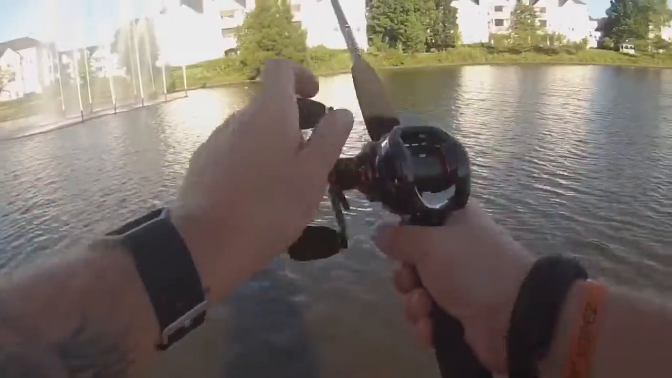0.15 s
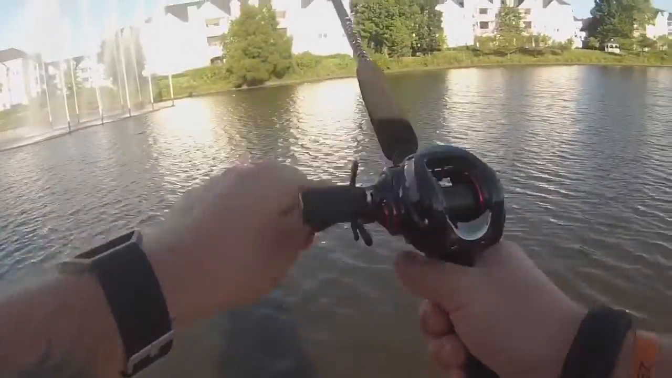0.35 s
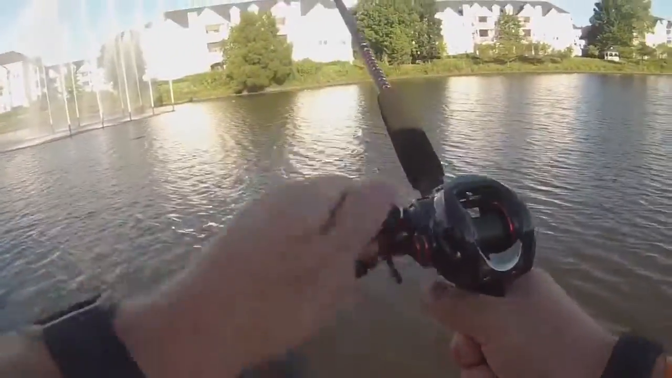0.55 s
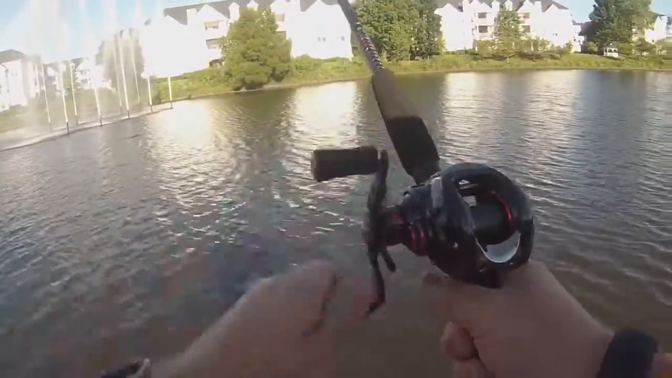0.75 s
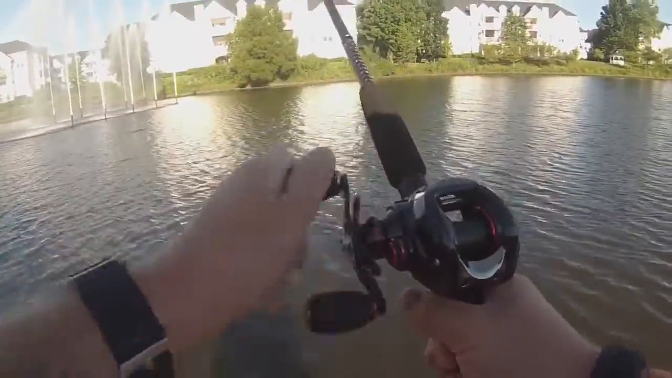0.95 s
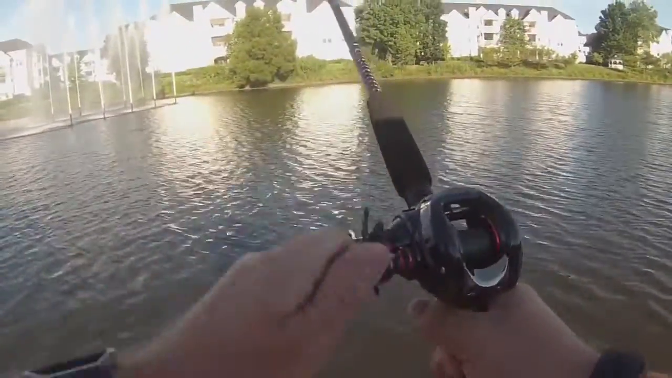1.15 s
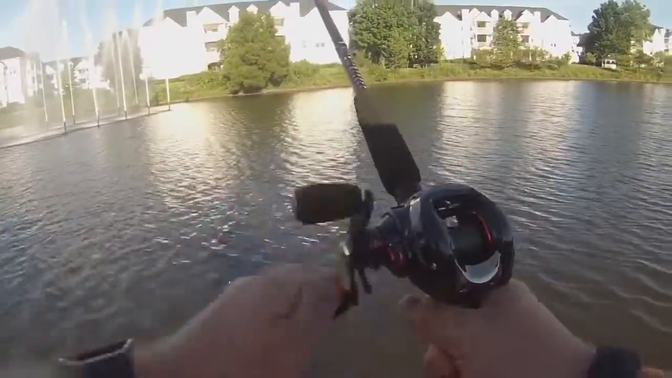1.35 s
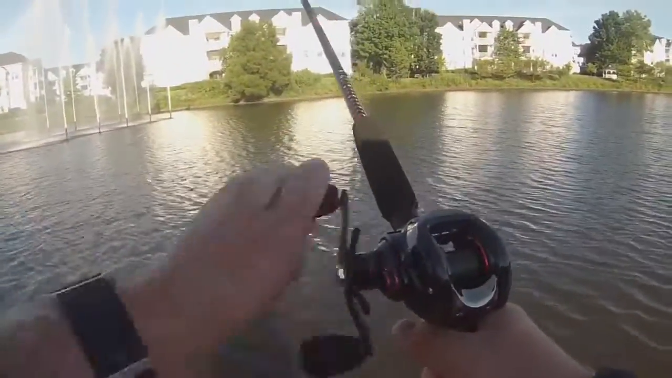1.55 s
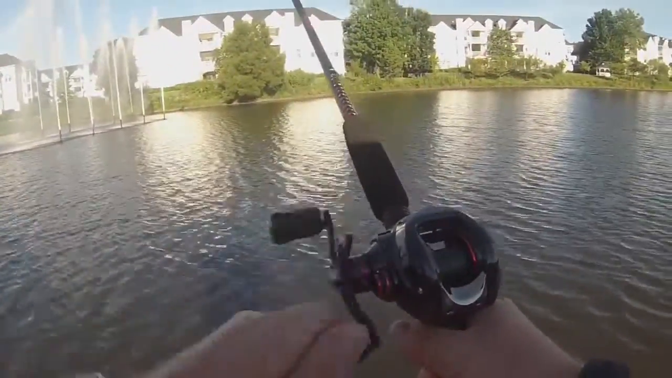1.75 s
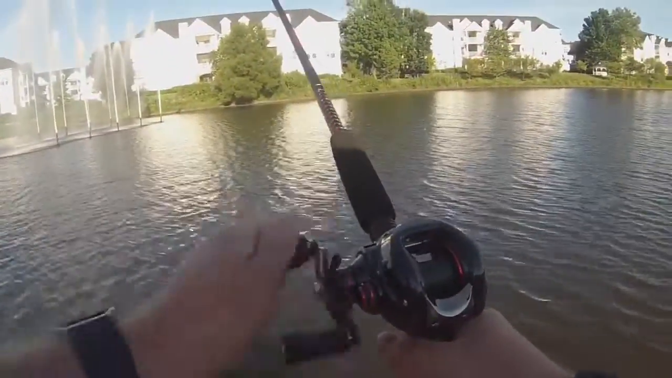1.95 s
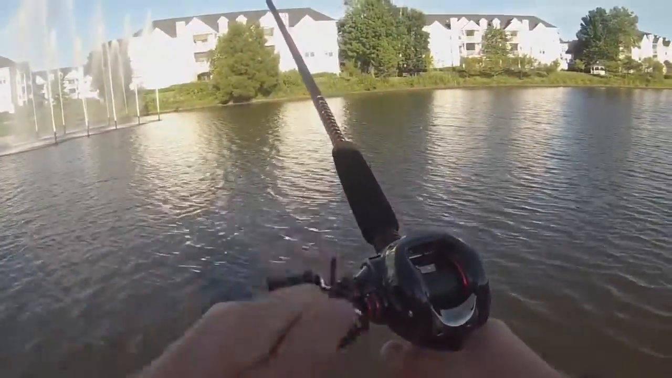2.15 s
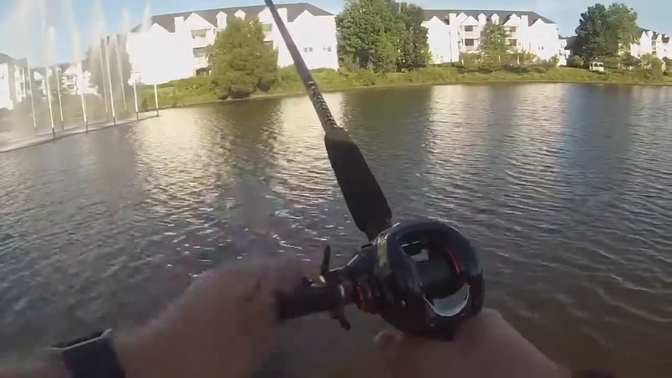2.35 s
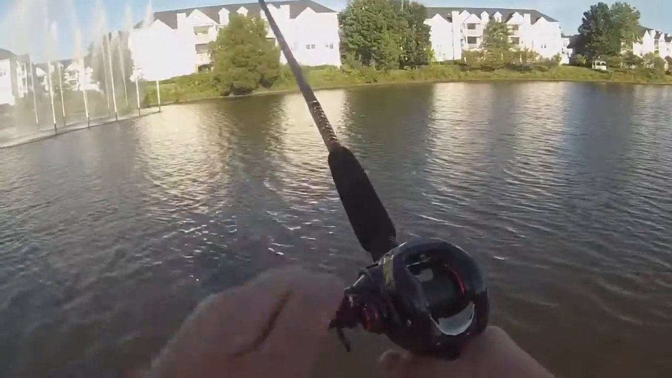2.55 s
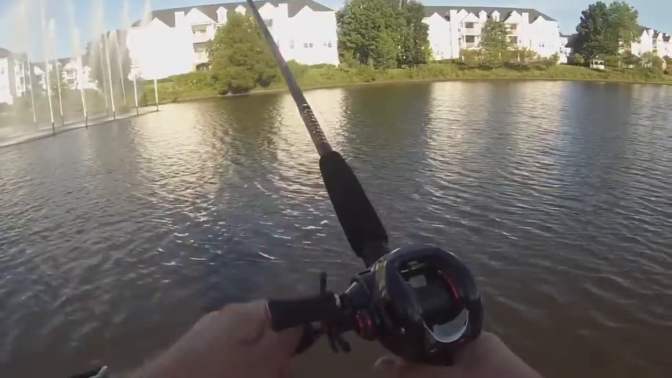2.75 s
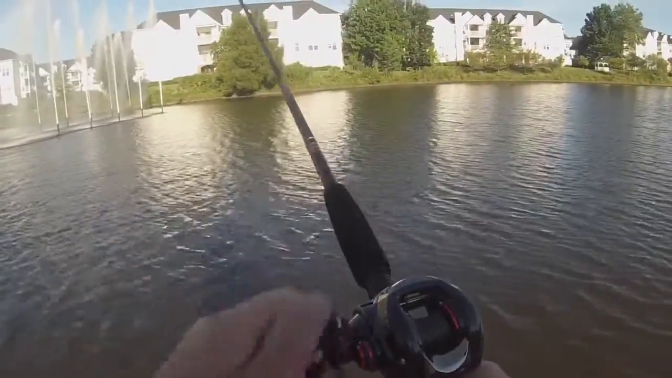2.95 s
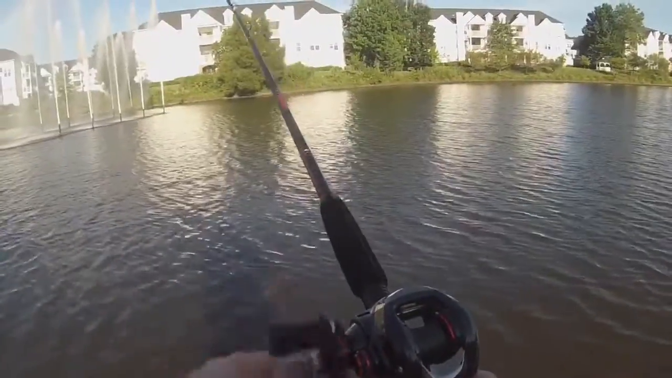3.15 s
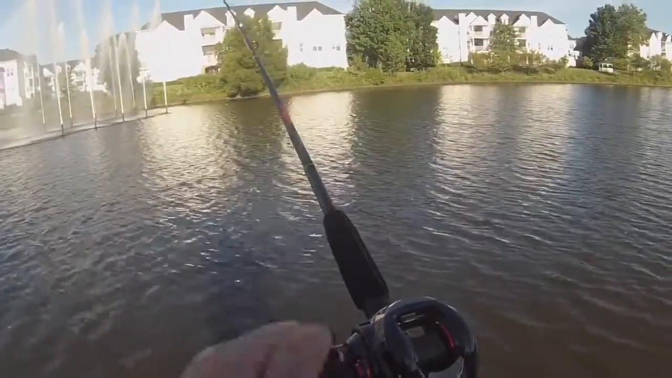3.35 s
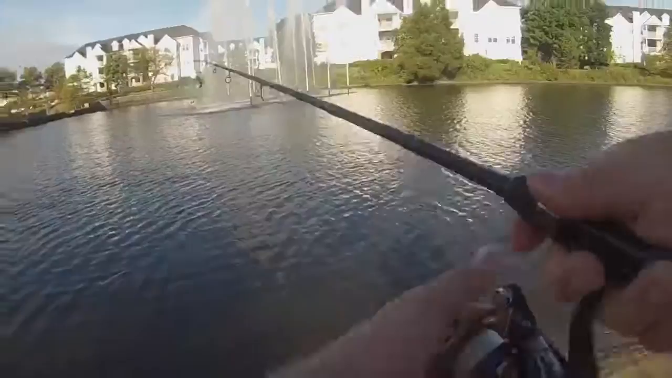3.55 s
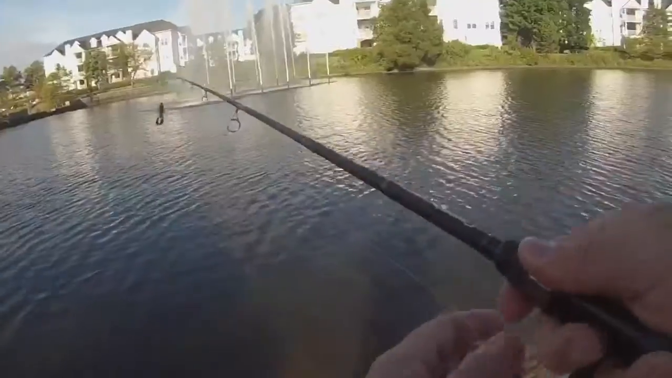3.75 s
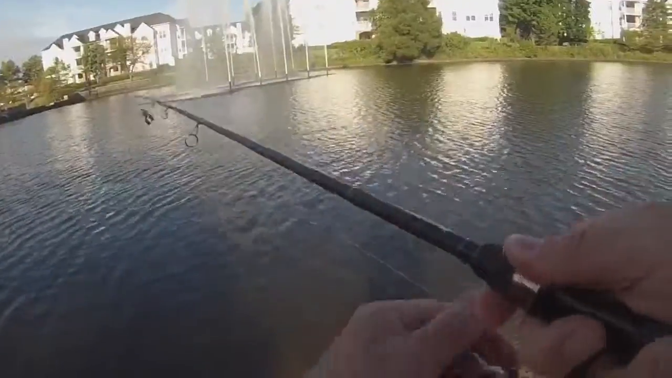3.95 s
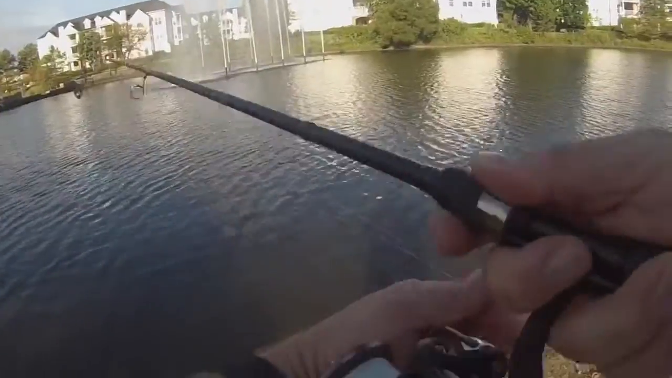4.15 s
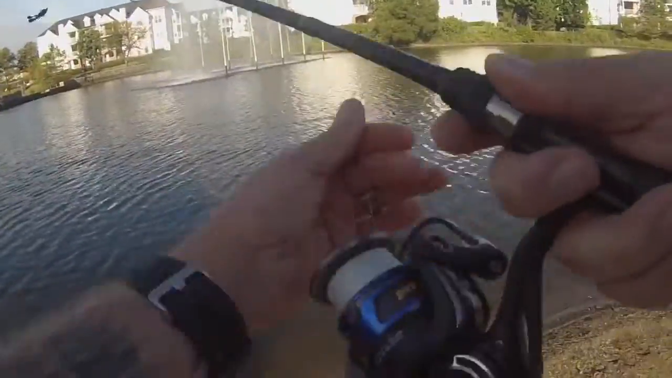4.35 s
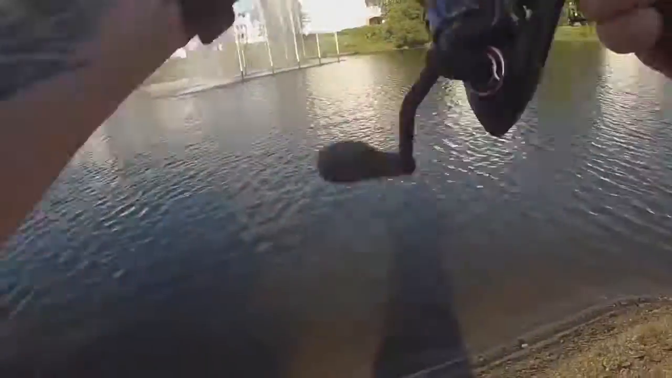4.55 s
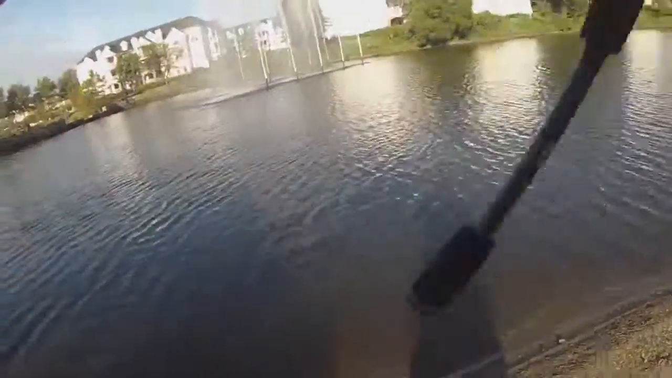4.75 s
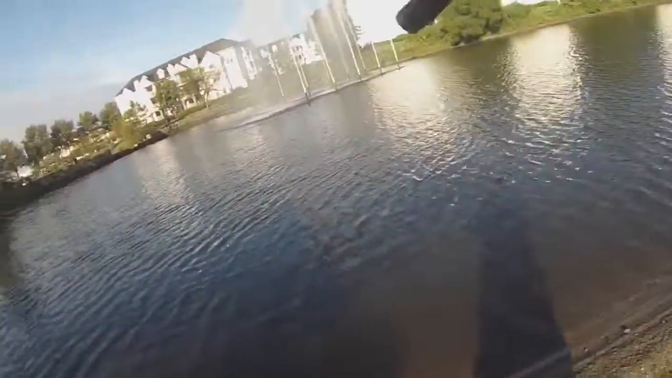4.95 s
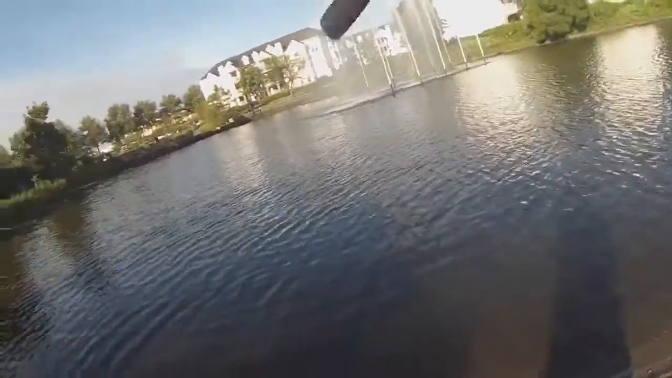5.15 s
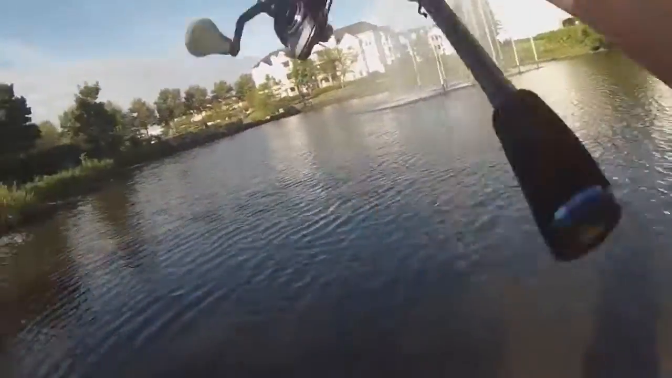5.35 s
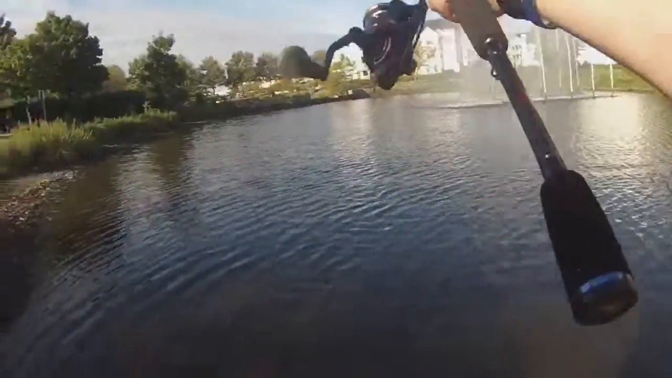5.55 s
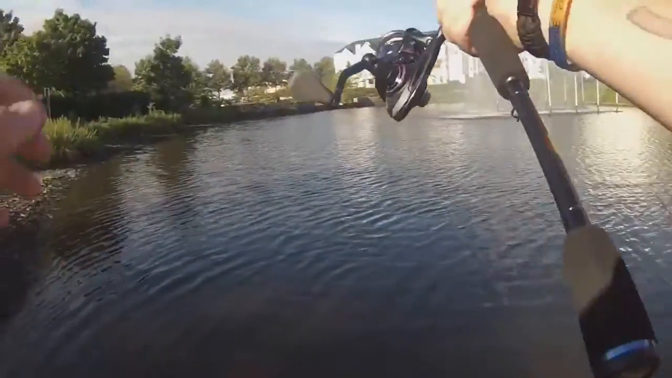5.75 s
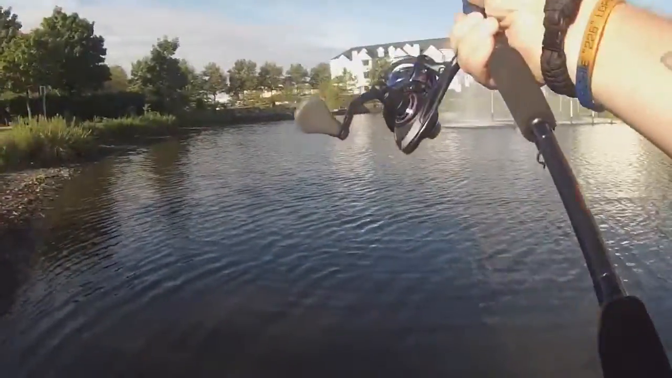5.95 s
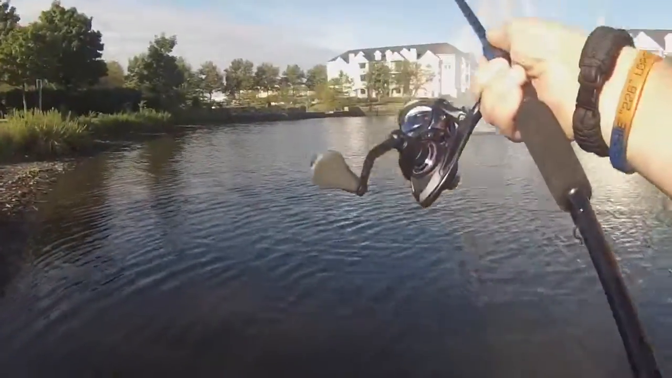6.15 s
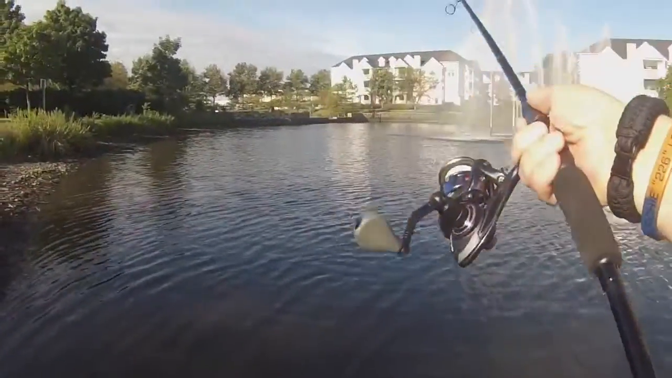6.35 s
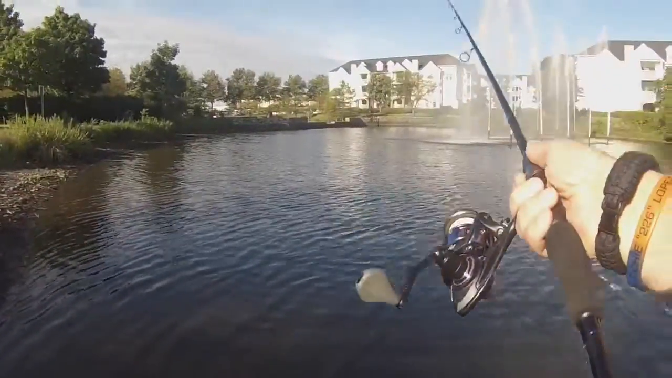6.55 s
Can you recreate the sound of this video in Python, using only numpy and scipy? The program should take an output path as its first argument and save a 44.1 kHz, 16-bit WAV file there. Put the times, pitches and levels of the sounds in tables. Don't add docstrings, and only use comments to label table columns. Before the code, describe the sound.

Outdoors by a pond, a faint continuous wash of far falling water, coloured hollow and plasticky by the microphone's sealed housing. First comes a crisp metallic reel clack and a few dull pops, then mostly hiss and low wind. After a momentary fade, a soft motor hum lies beneath; light clicks lead to one strong woody knock on the housing, then crackly strap tugs, a ringing tick and weak rattles.

```python
import sys
import numpy as np
from scipy import signal
from scipy.fft import rfft, irfft
from scipy.io import wavfile
from scipy.ndimage import uniform_filter1d

SR = 44100
rng = np.random.default_rng(int(sys.argv[2]) if len(sys.argv) > 2 else 0)


def to_linear_factor(level_db):
    exponent = np.asarray(level_db, float) / 20
    return 10 ** exponent


def dump(signal):
    limited = np.clip(np.atleast_2d(signal).T, -1, 1)
    pcm = np.round(limited * 32767).astype(np.int16)
    wavfile.write(sys.argv[1], SR, pcm)


N = 291501
EDIT_S = 3.613


def evened(x):
    return x / np.sqrt(np.mean(x ** 2) + 1e-20)


def read_spectrum(points, hz):
    point_hz, value = np.transpose(points)
    return np.interp(np.log(hz + 1), np.log(point_hz + 1), value)


def add(mix, start_s, sound):
    part = mix[round(start_s * SR):][:len(sound)]
    part += sound[:len(part)]


def drift(t, lo_hz, hi_hz):
    hz = np.geomspace(lo_hz, hi_hz, num=30)[:, None]
    sines = np.sin(2 * np.pi * (hz * t + rng.random(hz.shape)))
    return evened((sines / np.sqrt(hz)).sum(0))


def coloured_noise(level_db, size=1024):
    frames = 4 * N // size + 5
    hz = np.fft.rfftfreq(size, 1 / SR)[:, None]
    t = np.arange(frames) * size / 4 / SR
    real, imag = rng.standard_normal((frames, len(hz), 2)).T
    spectra = (real + 1j * imag) * to_linear_factor(level_db(hz, t))
    return evened(signal.istft(spectra, nperseg=size, noverlap=3 * size // 4)[1][:N])


# pitch_hz, width_hz, side_on_gain_db, facing_water_gain_db
CASE_MODES = [(1174, 350, 4.5, 5.5), (1401, 250, 10, 11.5), (1660, 234, 10, 13), (1904, 98, -4.5, 10),
              (2180, 105, -3.5, -6), (2338, 146, 5.5, 5.5), (2588, 97, 4.5, 6.5), (2800, 240, 0, 2),
              (3225, 300, 8, 8.5), (3527, 236, 9.5, 12.5), (3846, 335, 11, 4), (4290, 250, 4.5, -7.5),
              (4870, 460, 8.5, -4.5), (5660, 330, 5.5, 1), (6500, 570, -0.5, -0.5), (7100, 130, -7, 4),
              (7200, 300, 5, -8), (7800, 240, 2, -9), (8150, 200, 0.5, 2), (10400, 490, 1, -2.5)]


def case_db(hz, turn):
    total = 0
    for mode_hz, width_hz, side_db, facing_db in CASE_MODES:
        bump = np.exp(-np.log(16) * ((hz - mode_hz) / width_hz) ** 2)
        total = total + (side_db + (facing_db - side_db) * turn) * bump
    return total


# pitch_hz, density_db (per Hz)
SPRAY_FIRST = [(150, 2.5), (350, 0), (700, -1), (2000, 0), (3000, -8.5), (4100, -12.5), (5400, -14.5),
               (7000, -13), (8500, -20.5), (11000, -20.5), (13000, -25.5), (15000, -29.5)]
# pitch_hz, density_db (per Hz)
SPRAY_SECOND = [(150, -9), (350, 1.5), (700, -0.5), (2000, 1), (3000, -6.5), (4100, -9), (5400, -15),
                (7000, -12), (8500, -20.5), (11000, -21.5), (12500, -29), (13800, -20.5), (15000, -28)]
# time_s, level_db, turn_to_water (0-1)
FOUNTAIN_MOVES = [(0, -51, 0.04), (.9, -50.5, 0.03), (1.2, -51, 0), (2, -50, 0.06), (3, -52.5, 0),
                  (3.6, -52, 0), (3.63, -52.5, 0.32), (4.2, -52, .3), (4.8, -52, 0.38), (5, -50, 0.57),
                  (5.5, -50.5, 0.76), (6, -50.5, 0.9), (6.62, -50.5, 0.93)]


def fountains(patchy_db=0.68, flicker_db=0.39):
    time_s, level_db, turn = np.transpose(FOUNTAIN_MOVES)

    def field(hz, t):
        patches = rng.standard_normal((len(t), len(hz))).T
        patches = uniform_filter1d(patches, size=16, axis=0)
        patches = evened(uniform_filter1d(patches, size=10, axis=1))
        spray = np.where(t < EDIT_S, read_spectrum(SPRAY_FIRST, hz), read_spectrum(SPRAY_SECOND, hz))
        db = spray + case_db(hz, np.interp(t, time_s, turn))
        db = db - 10 * np.log10((to_linear_factor(db) ** 2).sum(0))
        return db + patchy_db * patches + flicker_db * drift(t, 8, 60)

    return coloured_noise(field) * to_linear_factor(np.interp(np.arange(N) / SR, time_s, level_db))


KNOCK_S, KNOCK_DB = 5.0546, -15
# pitch_hz, level_db, t60_s, direction (signed)
KNOCK_MODES = [(137, -5, 0.058, -0.79), (454, -1.5, 0.023, 1), (544, -2.5, .018, 0.94),
               (772, -8, 0.035, -1.04), (980, -8, 0.016, -1.16), (1430, -20, 0.028, 1),
               (1830, -17.5, 0.026, -1.2), (2450, -16, 0.029, 0.86), (2690, -19.5, 0.027, -1.3),
               (3050, -18, 0.017, 1), (3420, -24, 0.017, -1.1), (3800, -35, .012, 1)]


def knock(slowness=0.0353, fastest_hz=900):
    out = 0
    for hz, db, t60_s, direction in KNOCK_MODES:
        delay_s = slowness / np.sqrt(min(hz, fastest_hz))
        t = np.maximum(np.arange(SR // 5) / SR - delay_s, 0)
        out = out + direction * to_linear_factor(db - 60 * t / t60_s) * np.sin(2 * np.pi * hz * t)
    return to_linear_factor(KNOCK_DB) * uniform_filter1d(out, size=7)


def tick(noise, level_db, rise_s, t60_s, pitch_hz, spread_oct):
    t = np.arange(len(noise)) / SR
    hz = np.fft.rfftfreq(len(noise), 1 / SR) + 1
    band = np.exp(-.5 * (np.log2(hz / pitch_hz) / spread_oct) ** 2)
    colour = to_linear_factor(0.66 * case_db(hz, 0.41)) * band
    ring = signal.hilbert(irfft(rfft(noise) * colour))
    ring = (ring / (abs(ring) + 1e-9) ** .6).real
    shape = np.minimum(t / rise_s, 1) * to_linear_factor(-60 * np.maximum(t - rise_s, 0) / t60_s)
    return to_linear_factor(level_db) * evened(ring) * shape


# start_s, level_db, rise_s, t60_s, pitch_hz, spread_oct
TICKS = [(0.169, -46, 0.0008, 0.022, 2360, .3), (.2174, -30, 0.0017, 0.048, 2410, 0.067),
         (.2190, -27, .002, 0.017, 3500, 0.11), (0.2175, -38.5, 0.0033, 0.017, 1600, .25),
         (0.2185, -36, 0.0026, 0.018, 6400, .08), (.2180, -42, 0.0034, 0.013, 5400, .08),
         (.2185, -38, .002, .015, 2880, .04), (.2190, -38.5, 0.0022, .012, 8150, 0.052),
         (.2170, -45, 0.0037, .012, 10300, 0.32), (0.2297, -42, 0.0027, 0.026, 2530, 0.38),
         (.329, -59, .001, .01, 4500, 0.45), (3.689, -41.5, 0.00086, 0.0098, 1580, .12),
         (3.689, -43, .001, 0.011, 3350, .12), (3.688, -50, .001, 0.0089, 4400, .06),
         (3.688, -48.5, .001, .01, 5900, .12), (3.688, -57, .001, .008, 8200, .15),
         (4.1455, -47.5, .002, .03, 1910, .12), (4.146, -47, .002, .04, 3480, .12),
         (4.1448, -51.5, 0.0024, 0.025, 7300, .5), (4.147, -54, .002, .03, 4430, .05),
         (4.147, -53, .002, .03, 5500, .05), (5.198, -50, .006, .06, 480, .08),
         (4.158, -58, .002, .02, 6500, .4), (4.587, -63, .001, .01, 7200, .2),
         (4.6114, -51, 0.0012, 0.02, 3600, .2), (4.6114, -57, 0.00082, 0.013, 6950, .25),
         (4.779, -61, .001, .015, 5000, .7), (5.262, -46, .003, 0.036, 3350, .12),
         (5.277, -31, 0.0018, 0.038, 3320, 0.053), (5.277, -45.5, 0.0017, 0.029, 4800, .5),
         (5.2765, -41, 0.0016, 0.023, 2800, .15), (5.278, -39.5, .003, 0.081, 1694, .05),
         (5.96, -57, 0.0084, .08, 2600, 0.091), (5.991, -57, .004, .06, 2630, .1),
         (6.035, -47, .002, .03, 2530, .15), (6.234, -52, .004, 0.1, 2600, 0.2),
         (6.265, -51, .004, .06, 2600, .15), (6.29, -53, 0.0037, .06, 2650, .1),
         (6.346, -57, .003, .04, 2700, .08)]


def reel_ticks():
    out = np.zeros(N)
    for (start_s, *part), noise in zip(TICKS, rng.standard_normal((len(TICKS), 4096))):
        add(out, start_s, tick(noise, *part))
    return out


def tug(peak_db, snap_s, direction, build_s, rebound_s):
    t = np.arange(SR // 5) / SR - 1 / 10
    swell = np.exp(-abs(t) / np.where(t < 0, build_s, rebound_s))
    return direction * to_linear_factor(peak_db) * np.tanh(t / snap_s) * swell


# snap_at_s, peak_db, snap_s, direction (signed), build_s, rebound_s
TUGS = [(0.171, -44, 0.0022, -1, 0.0044, .01), (0.354, -38.5, 0.00094, 1, .003, .003),
        (.483, -38.5, 0.00063, -1, .003, .003), (1.024, -43, .0015, 1, .004, .004),
        (4.1314, -34, 0.00042, -0.77, 0.0033, 0.006), (5.315, -38, 0.0014, -1, 0.0045, .003),
        (5.355, -33.5, .0015, -0.95, 0.021, 0.0024), (5.334, -42, .003, 1, .005, .01),
        (5.398, -34.5, 0.0011, 0.96, 0.0053, 0.0027), (5.421, -37, .001, 1, 0.0066, 0.0017),
        (5.434, -38, 0.00087, 1, .004, .004), (5.457, -38, .0015, -1, 0.0087, .003),
        (5.541, -34, 0.00085, 1, .004, 0.0026)]


def harness_tugs():
    out = np.zeros(N)
    for snap_at_s, *pull in TUGS:
        add(out, snap_at_s - 1 / 10, tug(*pull))
    return out


# time_s, rumble_db, buffeting_db
WIND_GUSTS = [
    [(0.0, -72, -62), (0.18, -53, -64.5), (0.3, -63, -63.5), (0.54, -58.5, -58.5), (1.4, -57.5, -65.5),
     (1.49, -52, -66), (1.59, -67, -64), (1.64, -59, -65), (2.25, -62.5, -65), (2.31, -56, -66.5),
     (2.53, -71.5, -73), (2.74, -61, -65), (2.86, -76, -66), (2.93, -62, -63), (3.02, -74, -65),
     (3.22, -58, -63.5), (3.38, -85, -62.5), (3.6, -59, -66)],
    [(3.63, -57.5, -64), (3.83, -57, -63), (3.96, -71, -64), (4.09, -56, -65.5), (4.44, -66, -62),
     (4.55, -60, -62.5), (4.74, -64, -63), (4.99, -56, -59.5), (5.05, -49, -61), (5.21, -56, -58.5),
     (5.34, -48, -56.5), (5.66, -59, -64.5), (6.21, -61.5, -62), (6.29, -54.5, -61.5), (6.61, -61, -65)],
]
# pitch_hz, density_db (per Hz)
RUMBLE = [(4, -2), (12, -3), (30, -1.5), (60, -16), (120, -22), (300, -58)]
# pitch_hz, density_db (per Hz)
BUFFET = [(20, -24), (60, -1.5), (110, -1), (200, -5), (350, -13), (700, -32.5), (1500, -52)]


def wind(lumpy_db=1.5, gusty_db=1.5):
    t = np.arange(N) / SR
    time_s, rumble_db, buffet_db = np.vstack(WIND_GUSTS).T
    rumble = coloured_noise(lambda hz, u: read_spectrum(RUMBLE, hz) + lumpy_db * drift(u, 1, 6.5), size=4096)
    buffet = coloured_noise(lambda hz, u: read_spectrum(BUFFET, hz) + gusty_db * drift(u, 3, 40))
    rumble_gain = to_linear_factor(np.interp(t, time_s, rumble_db))
    buffet_gain = to_linear_factor(np.interp(t, time_s, buffet_db) + 3)
    return rumble_gain * rumble + buffet_gain * buffet


PUMP_HZ = 71.6
# time_s, level_db
PUMP_LEVEL = [(3.61, -52), (3.9, -54.5), (4.4, -58), (4.9, -61), (5.5, -59.5), (6, -62.5), (6.62, -58.5)]


def pump():
    t = np.arange(N) / SR
    time_s, level_db = np.transpose(PUMP_LEVEL)
    pitch_hz = PUMP_HZ * (1 + 0.0046 * drift(t, .5, 3.3))
    tone = np.sin(2 * np.pi * np.cumsum(pitch_hz) / SR)
    wavering_db = np.interp(t, time_s, level_db) + 1.1 * drift(t, 0.95, 3.7)
    return np.sqrt(2) * to_linear_factor(wavering_db) * tone * (t > EDIT_S)


def scene():
    handling = reel_ticks() + harness_tugs()
    add(handling, KNOCK_S, knock())
    return (fountains() + handling + wind() + pump())[None]


def drop_faint_treble(x, from_hz=12850, keep_db=-104.5):
    hz, _, cells = signal.stft(x, SR, nperseg=1024, noverlap=768)
    power = uniform_filter1d(abs(cells) ** 2, size=3, axis=1)
    power = uniform_filter1d(power, size=4, axis=2)
    weak = (power < to_linear_factor(keep_db) ** 2) & (hz[:, None] > from_hz)
    return signal.istft(cells * ~weak, SR, nperseg=1024, noverlap=768)[1][:, :N]


def roll_off(x):
    return signal.sosfilt(signal.butter(12, 15560, fs=SR, output="sos"), x)


def record(dry):
    lowpass = signal.firwin(301, 15350, window=("kaiser", 8), fs=SR)
    shot = drop_faint_treble(signal.oaconvolve(dry, lowpass[None], "same"))
    t = np.arange(N) / SR - EDIT_S
    fade_out_s, fade_in_s = 0.04, 0.026
    fade = np.clip(np.maximum(-t / fade_out_s, t / fade_in_s), .02, 1)
    return roll_off(shot * fade)


dry = scene()
out = record(dry)
dump(out)
```